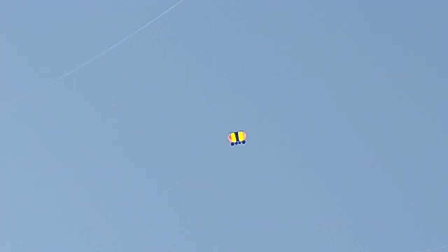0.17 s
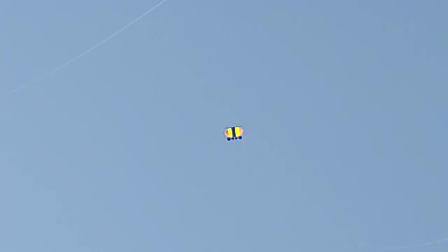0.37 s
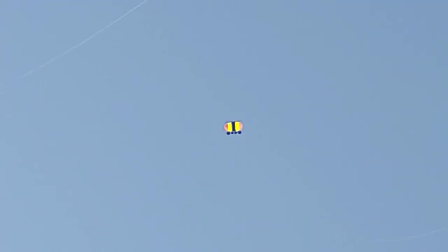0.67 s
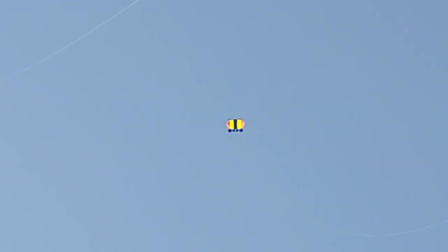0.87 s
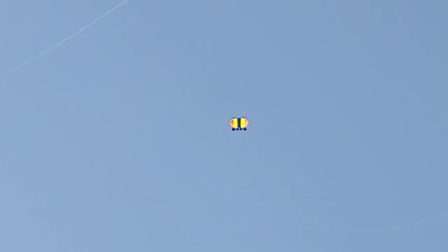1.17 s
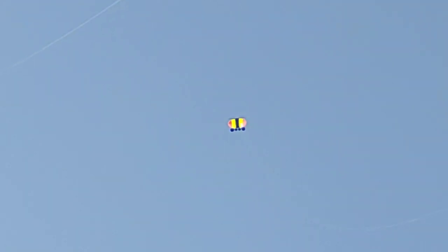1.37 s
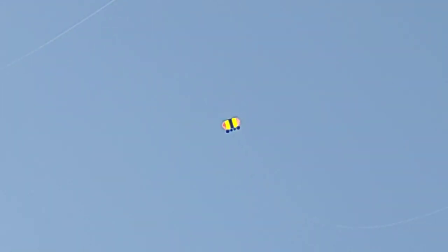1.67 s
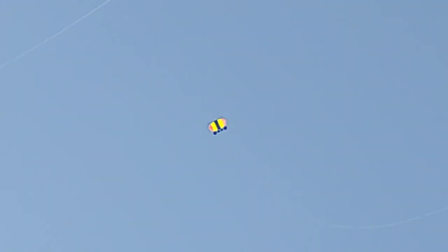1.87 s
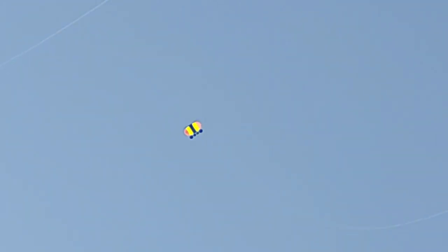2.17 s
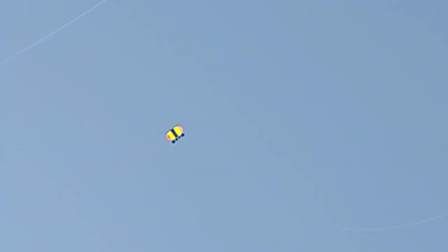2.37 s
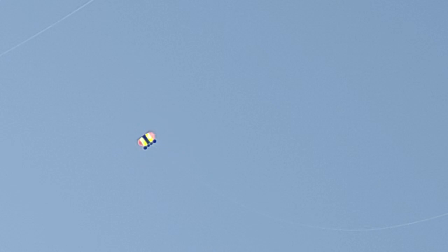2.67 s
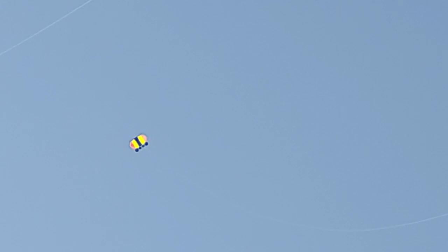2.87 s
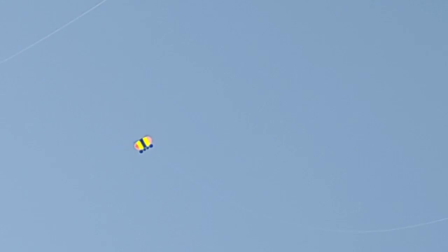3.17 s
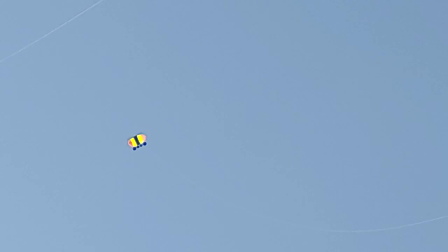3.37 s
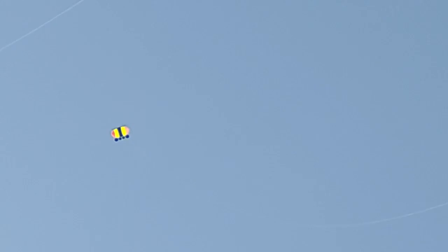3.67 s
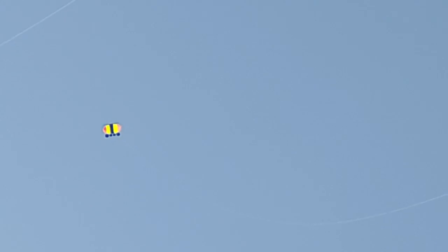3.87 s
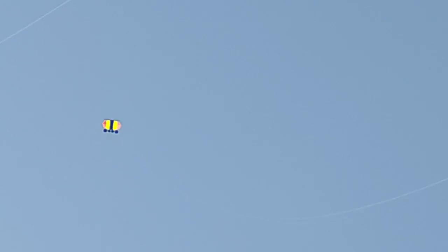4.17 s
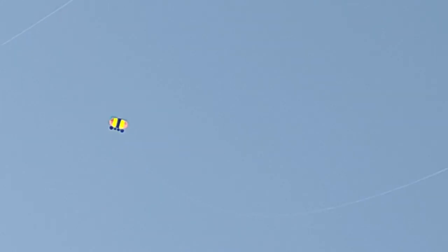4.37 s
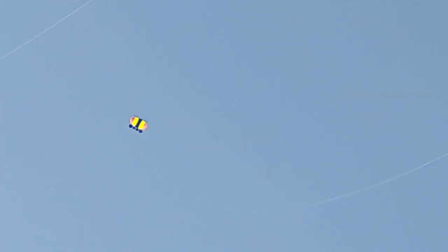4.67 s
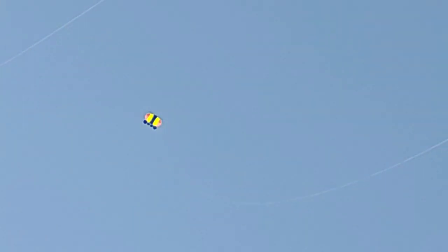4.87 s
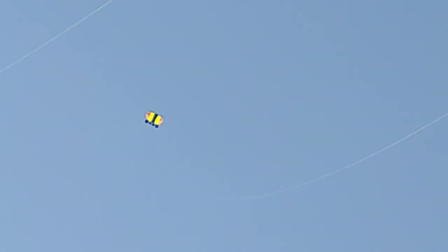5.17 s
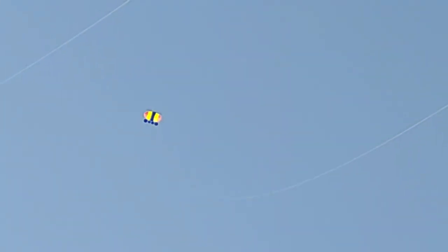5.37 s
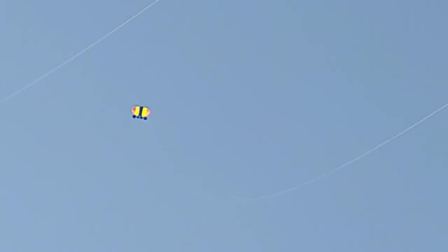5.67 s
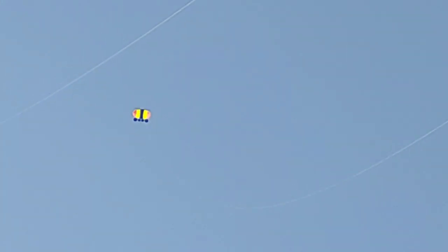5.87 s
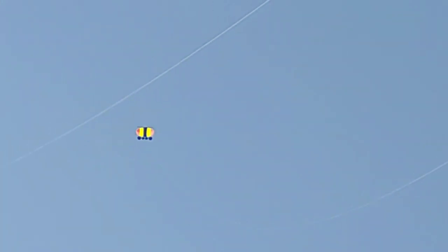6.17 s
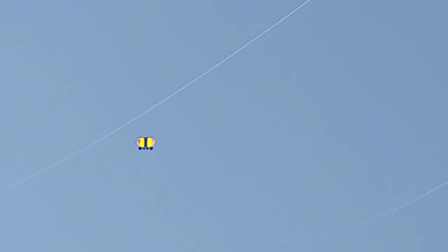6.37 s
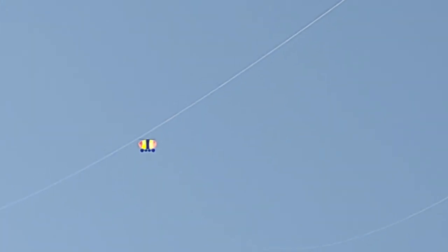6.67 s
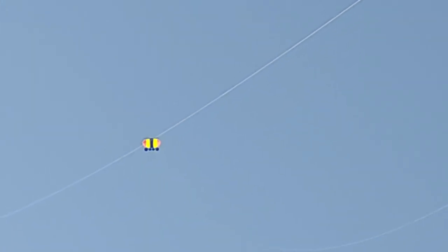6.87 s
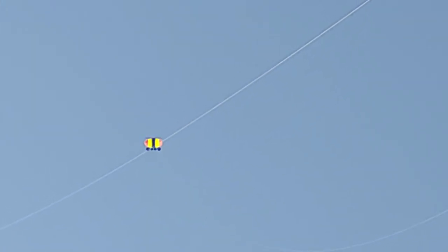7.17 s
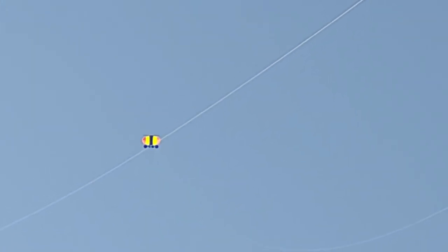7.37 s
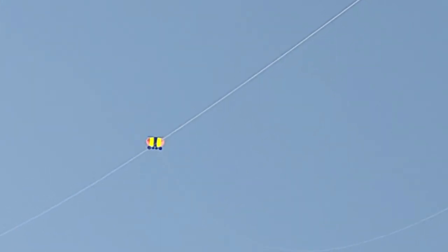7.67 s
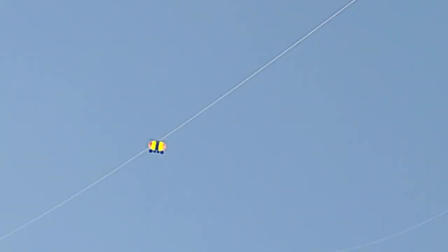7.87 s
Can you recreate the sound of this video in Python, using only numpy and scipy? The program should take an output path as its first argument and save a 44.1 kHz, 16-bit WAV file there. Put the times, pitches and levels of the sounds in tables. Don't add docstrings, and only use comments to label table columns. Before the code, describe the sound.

A wavering, reedy low drone from wind-driven kite ribbons outdoors, swelling and fading over faint wind wash, with lumpy gusts thumping the left side.

```python
import sys
import numpy as np
from scipy import signal
from scipy.io import wavfile

SR = 44100
rng = np.random.default_rng(int(sys.argv[2]) if len(sys.argv) > 2 else 0)


def file_out(sig):
    cols = np.atleast_2d(sig).T
    lim = np.clip(cols, -1, 1)
    pcm = np.round(lim * 32767).astype(np.int16)
    wavfile.write(sys.argv[1], SR, pcm)


def gain_from_db(level_db):
    decades = np.asarray(level_db, float) / 20
    return 10 ** decades


N = 353020
CONTROL = 40

# [t/s, big f/Hz, shrill f/Hz, thin f/Hz, mellow f/Hz]
NEAR_PITCH = [(0.0, 64.07, 84.49, 89.88, 73.0), (0.5, 64.1, 84.46, 89.7, 72.62),
              (1.0, 64.23, 84.7, 89.7, 72.77), (1.5, 64.05, 84.76, 89.77, 73.23),
              (2.0, 63.89, 84.8, 89.63, 73.76), (2.5, 63.89, 85.0, 89.41, 74.11),
              (3.0, 64.05, 85.1, 89.34, 74.11), (3.5, 64.07, 85.1, 89.92, 73.06),
              (4.0, 64.12, 84.97, 90.35, 73.23), (4.5, 64.1, 84.9, 90.09, 73.23),
              (5.0, 64.1, 85.07, 89.7, 73.23), (5.5, 64.15, 84.93, 89.23, 73.09),
              (6.0, 64.25, 84.87, 89.34, 72.91), (6.5, 64.41, 84.83, 89.95, 72.85),
              (7.0, 64.38, 85.04, 90.49, 72.82), (7.5, 64.46, 85.04, 90.74, 72.82),
              (8.0, 64.46, 85.1, 90.13, 72.82)]
FAR_PITCH_HZ = [45.92, 68.25]
# [left level/dB, right level/dB]
BIG = [(-63.0, -64.0), (-64.0, -61.0), (-52.0, -54.0), (-80.0, -74.0), (-59.0, -67.0), (-62.0, -65.0),
       (-60.0, -58.0), (-70.0, -72.0), (-55.0, -57.0), (-65.0, -55.0), (-47.0, -50.0), (-46.0, -49.0),
       (-46.0, -48.0), (-56.0, -52.0), (-60.0, -63.0), (-61.0, -61.0), (-72.0, -65.0), (-65.0, -63.0),
       (-67.0, -63.0), (-69.0, -64.0), (-73.0, -68.0), (-68.0, -78.0), (-68.0, -71.0), (-64.0, -60.0),
       (-70.0, -63.0), (-67.0, -63.0), (-78.0, -70.0)]
SHRILL = [(-69.0, -67.0), (-63.0, -63.0), (-80.0, -81.0), (-73.0, -71.0), (-65.0, -64.0), (-80.0, -80.0),
          (-71.0, -71.0), (-71.0, -63.0), (-62.0, -68.0), (-57.0, -58.0), (-60.0, -55.0), (-66.0, -66.0),
          (-70.0, -71.0), (-72.0, -66.0), (-68.0, -65.0), (-77.0, -79.0)]
THIN = [(-70.0, -64.0), (-66.0, -76.0), (-63.0, -63.0), (-67.0, -65.0), (-66.0, -65.0), (-74.0, -70.0),
        (-66.0, -62.0), (-70.0, -69.0), (-74.0, -66.0), (-71.0, -73.0), (-76.0, -75.0), (-75.0, -73.0),
        (-73.0, -73.0), (-75.0, -77.0), (-78.0, -81.0), (-77.0, -86.0)]
MELLOW = [(-51.0, -54.0), (-57.0, -56.0), (-71.0, -63.0), (-58.0, -60.0), (-61.0, -64.0), (-62.0, -63.0),
          (-70.0, -65.0), (-64.0, -64.0), (-68.0, -73.0), (-61.0, -63.0), (-65.0, -65.0), (-60.0, -63.0),
          (-72.0, -70.0)]
DEEP = [(-62.0, -62.0), (-60.0, -65.0), (-53.0, -57.0), (-77.0, -63.0), (-67.0, -67.0), (-73.0, -69.0),
        (-61.0, -62.0), (-63.0, -68.0), (-64.0, -63.0), (-66.0, -66.0), (-65.0, -64.0), (-71.0, -63.0)]
SOFT = [(-70.0, -62.0), (-69.0, -69.0), (-79.0, -68.0), (-58.0, -60.0), (-55.0, -57.0), (-60.0, -60.0),
        (-62.0, -73.0)]
# [left level/dB, right level/dB]
THIN_LOW = [(-60.0, -62.0)]
FIRST_OVERTONE = [2, 5, 12, 2, 17, 3, 6]
# [level/dB, left lag/ms, tilt above 1.2 kHz/dB per octave]
PLACE = [
    (3, -0.068, -5.5),
    (8, 0.13, 5.5),
    (-8, 0.063, 12),
    (4.5, -0.068, 0),
    (1, -0.11, -9),
    (3, 0.09, 0),
    (-6, 0.03, 0),
]
# [t/s, level/dB over usual]
BIG_SWINGS = [(.01, 1), (.28, -4.5), (.75, 3.5), (1.2, 7), (1.6, -3.5), (1.85, -5.5), (2.5, 2), (3.0, 3.5),
              (3.38, -2), (3.75, 1), (4.25, 3), (5.0, -0.1), (5.45, -3.5), (5.65, -4), (6.2, 3.5),
              (6.52, 9), (6.85, 3.5), (7.3, 0.5), (7.9, 3.5)]
SHRILL_SWINGS = [(.01, 5.5), (.27, -8.5), (.66, 4.5), (1.15, 0.5), (1.5, -8.5), (1.85, 2.5), (2.2, 1.5),
                 (2.5, 3.5), (2.75, -1), (2.95, 1), (3.22, -7.5), (3.58, 7), (4.1, -4), (4.55, -5.5),
                 (4.8, -3), (5.15, 2.5), (5.45, -5.5), (5.68, 4), (5.95, 5.5), (6.28, -2.5), (6.52, 4.5),
                 (7.0, 3.5), (7.25, -7.5), (7.5, 4), (7.75, -3)]
THIN_SWINGS = [(.3, 2.5), (.75, -4), (1.05, 8), (1.3, 9), (1.6, 7.5), (1.9, 6.5), (2.2, 0), (2.5, 8.5),
               (2.8, 8.5), (3.1, 8), (3.5, 6), (4.0, 2), (4.3, 7), (4.55, 2.5), (4.9, 3), (5.2, -13),
               (5.6, 4), (5.95, 2), (6.3, 1.5), (6.6, 1), (7.0, 1), (7.3, 4.5), (7.6, -5), (7.9, 1)]
MELLOW_SWINGS = [(.01, 0), (.5, -13), (1.25, -4), (1.55, 1.5), (2.55, -6), (2.95, 3), (3.25, 7.5),
                 (3.65, -12), (4.4, -5), (5.0, 0), (6.0, -8), (6.75, -5), (7.1, 6)]
DEEP_SWINGS = [
    (.12, -35),
    (1.12, -19),
    (3.1, 11),
    (3.75, -4),
    (4.0, 6),
    (4.75, -5),
    (5.25, 9),
    (5.75, -37),
    (6.75, -14),
    (7.25, -1),
]
USUAL_DB = [0.073, .1, 1.24, 0.24, .1]
SWING_S = [0.17, 0.14, 0.16, 0.17, 0.22]
# [t/s, level/dB]
THIN_LOW_SWINGS = [
    (.1, 19),
    (.5, 14),
    (.85, 1),
    (1.6, 4),
    (3.4, 14),
    (3.8, 18.5),
    (4.1, 11),
    (5.6, 4),
    (7.0, 10),
]
# [t/s, level/dB]
BIG_UNDER = [
    (.8, 7),
    (1.5, 0),
    (2.1, -5),
    (2.6, -2),
    (3.1, -3),
    (3.9, -0.5),
    (4.9, -6),
    (5.75, 2),
    (6.6, -1),
    (7.4, -7),
]
BIG_OVER = [
    (.4, -3),
    (1.05, -8),
    (1.55, 9.5),
    (2.2, 2),
    (2.95, 2),
    (3.8, 0),
    (4.9, 1),
    (5.6, -6),
    (6.4, -8),
    (7.4, -4),
]
BIG_SIDE = [(.3, 3), (1.0, 0.5), (1.7, 1), (2.5, 3.5), (3.4, -9), (4.0, -11), (4.6, -10), (5.2, 2),
            (6.1, 0), (6.8, 3.5), (7.5, 0)]
TWIST_S = 0.34
UNDER_HZ, OVER_HZ, TWIST_WIDTH_HZ = 257, 980, 64
SIDE_HZ, SIDE_WIDTH_HZ = 680, 52
# [t/s, level/dB]
GLINTS = [(.05, -4), (.3, 2.5), (.65, 2.5), (1.0, -3), (2.1, 1.5), (2.4, -1), (3.25, -5), (4.25, 2),
          (5.45, 2), (6.25, 4), (6.45, -4), (6.62, 6.5), (6.95, -3), (7.15, 6), (7.9, 0)]
GLINT_S, GLINT_HZ, GLINT_WIDTH_HZ = 0.096, 1610, 85
SHIMMER, FLUTTER, BLUR = .2, .16, .13
SHRILL_BLUR = 1.7
# [left level/dB, right level/dB]
SHRILL_BUZZ = [(-85, -85), (-79.5, -83), (-77, -81), (-82, -77), (-85, -92), (-87, -98), (-92, -97),
               (-85, -80.5), (-80.5, -85), (-101, -94), (-89, -92), (-98, -97), (-82.5, -89.5),
               (-96, -94.5), (-83.5, -99)]
THIN_BUZZ = [(-85, -93), (-89, -86), (-97, -91), (-86, -93), (-86.5, -92), (-80, -90), (-86, -93),
             (-84, -96), (-79, -94), (-87.5, -99), (-91, -100), (-87, -97), (-97, -102), (-90, -94),
             (-94, -101), (-88, -102)]
BUZZ_FOLLOWS, THIN_BUZZ_FOLLOWS = 0.51, .25
# [t/s, level/dB]
THIN_BUZZ_SWINGS = [(.4, -6), (.7, 2.5), (1.08, 3), (1.3, 3), (1.55, -9), (1.9, -11), (2.2, -7), (2.5, -1),
                    (2.9, -2), (3.6, 5), (4.4, 3), (5.5, 5), (5.95, 11), (6.5, 9.5), (6.95, 10), (7.5, 1.5)]

# [t/s, peak level/dB, f/Hz]
STRONG_EDDIES = [(0.287, -12, 114), (0.481, -15.5, 136), (0.506, -14, 94), (0.698, -17, 141),
                 (1.555, -16.5, 108), (1.643, -16, 113), (2.108, -20.5, 112), (3.632, -16.5, 82),
                 (3.693, -17, 134), (3.737, -12.5, 119), (3.79, -14, 154), (3.936, -12.5, 92),
                 (4.055, -5, 183), (4.068, -8, 115), (4.08, -15, 170), (4.089, -15, 123), (4.128, -10, 92),
                 (4.159, -14.5, 116), (4.174, -16, 149), (4.194, -13.5, 130), (4.241, -14, 80),
                 (4.45, -12, 108), (5.057, -13.5, 151), (5.083, -15, 90), (5.095, -6, 200),
                 (5.103, -6.5, 144), (5.112, -13, 130), (5.127, -8.5, 110), (5.139, -15.5, 230),
                 (5.15, -14, 99), (5.177, -12, 105), (5.221, -8.5, 105), (5.236, -12, 94),
                 (5.499, -16.5, 105), (5.788, -18, 98), (5.869, -17, 127), (6.268, -17, 105),
                 (7.173, -14.5, 114)]
# [t/s, peak level/dB, f/Hz]
WEAK_EDDIES = [(0.37, -20, 94), (0.614, -17.5, 91), (0.751, -31, 101), (0.808, -25, 98), (0.832, -24, 100),
               (0.901, -21, 101), (0.944, -25.5, 100), (0.987, -18.5, 93), (1.117, -18.5, 134),
               (1.173, -16.5, 100), (1.212, -21.5, 83), (1.258, -21, 92), (1.676, -26, 84),
               (1.856, -22.5, 98), (2.09, -15, 88.4), (3.314, -27, 142), (3.484, -25, 97),
               (3.543, -23, 121), (3.587, -22, 126), (3.765, -17, 99), (3.827, -16, 119), (3.851, -26, 87),
               (3.879, -28, 100), (3.975, -28, 95), (4.285, -17.5, 80), (4.392, -22, 114), (4.505, -24, 92),
               (4.531, -21.5, 118), (4.559, -24, 92), (4.64, -20, 106), (4.818, -20.5, 83),
               (4.843, -18, 92.5), (4.945, -19.0, 124), (5.003, -26, 104), (5.035, -18, 102),
               (5.251, -16, 91), (5.28, -15.5, 109), (5.352, -25, 114), (5.402, -16, 107),
               (5.443, -16.5, 130), (5.538, -18, 113), (5.639, -24, 105), (5.717, -29, 119),
               (5.817, -21.5, 147), (5.891, -17.5, 82.5), (6.18, -25, 81.5), (6.238, -18.5, 103),
               (6.354, -19.5, 91), (6.377, -26, 92), (6.417, -17.5, 111), (6.802, -17.5, 145),
               (6.849, -21, 119), (6.9, -21, 95), (7.021, -24.5, 97), (7.063, -21, 105), (7.087, -24, 113),
               (7.122, -27, 94), (7.213, -19, 119)]
EDDY_RISE, EDDY_FALL = 0.72, 0.67
# [t/s, level at the left port/dB]
GUST = [(0, -44), (.35, -40), (.75, -36.5), (1.1, -41), (2.0, -41), (2.5, -46), (2.8, -44), (3.3, -45),
        (3.75, -38), (4.15, -45.5), (4.85, -39), (5.25, -32.5), (5.5, -39.5), (6.25, -41.5), (6.55, -43),
        (7.05, -35.5), (7.5, -48.5), (8, -41.5)]
LEE_DB, LEE_FOLLOWS = -48.5, 0.48

# [t/s, level/dB, share in the top colour/0-1]
FLARES = [(.01, 7, 0.34), (.68, 13, 0.34), (1.1, 2, 0.86), (1.3, 3.5, 1), (1.9, 14, 0.1), (2.2, -1, .1),
          (2.55, 9, 0.24), (3.0, 5.5, 0.56), (3.48, 10, 0.25), (3.65, 21, 0.46), (4.15, 5, 0.26),
          (5.17, 14, 0.14), (5.72, 12.5, 0.14), (6.02, 14, 0.32), (6.6, 4, 0.44), (6.98, 10.5, 0.41),
          (7.55, 15, 0.11)]
# [t/s, level/dB]
LULLS = [(.3, -1.5), (.85, -2), (1.45, -2), (1.6, -0.5), (2.25, -4.5), (3.75, 0.5), (4.7, -5), (5.45, -1),
         (6.3, -1), (6.8, 2), (7.2, 1), (7.85, -3)]
FLARE_S, BRIGHT_S = .12, 0.089
# [f/Hz, density/dB per Hz]
WASH_LOW = [(150, 4.5), (250, 3), (320, -9.5), (500, 0), (650, -4.5), (850, 5), (1050, -8), (1300, -1)]
WASH_MID = [(900, -18), (1130, 2), (1270, 11), (1400, -25), (1600, -8), (1780, -24), (2200, -28)]
WASH_HIGH = [(1500, -6.5), (1800, 12.5), (2000, -1.5), (2250, -1), (2450, -3.5), (2900, -32), (3600, -23.5),
             (5000, -31)]
WASH_LOW_DB, WASH_MID_DB, WASH_HIGH_DB = -45.5, -62.5, -58.5
# [t/s, level/dB]
AIR = [
    (0, 2.5),
    (1.4, 1.5),
    (2.0, -0.5),
    (3.0, 0),
    (4.1, 3),
    (5.0, -3),
    (5.8, -1),
    (6.8, 0),
    (8, -3.5),
]
# [f/Hz, density/dB per Hz]
HISS = [(1650, -33), (2800, -14), (3570, -11), (6570, -15), (10400, -24), (12200, -22.5), (15600, -24)]
HISS_START_DB, HISS_FADE_DB_PER_S, HISS_FOLLOWS_FLARE = -68, 0.13, .08
# [t/s, level/dB]
PUFFS = [
    (.35, 0),
    (1.15, 1),
    (2.05, 0.5),
    (4.45, 0.5),
    (4.9, 2),
    (6.4, -1.5),
]
PUFF_S = 0.26
# [f/Hz, likeness/-1 to 1]
LIKENESS = [(60, 0.2), (130, 1), (290, 1), (640, -0.0093), (1410, -0.27), (2300, 0.18), (3800, -0.042),
            (15000, -0.0039)]
# [f/Hz, left minus right/dB]
LEANING = [(60, 6.5), (92, 11), (140, -2), (210, 0), (330, 3.5), (500, 3), (770, 2.5), (1170, -1),
           (1790, -3), (2740, 8.5), (4190, 6), (6410, 5.5), (9810, -2.5), (15000, 8)]


def hummers(bright_db):
    still = np.ones(N // CONTROL + 1)
    ribbons = [BIG, SHRILL, THIN, MELLOW, DEEP, SOFT, THIN_LOW]
    pitches = in_time(NEAR_PITCH, step=CONTROL) + [hz * still for hz in FAR_PITCH_HZ]
    pitches.append(pitches[2])
    turns = [BIG_SWINGS, SHRILL_SWINGS, THIN_SWINGS, MELLOW_SWINGS, DEEP_SWINGS]
    swells = [db + swings(rows, s) for rows, db, s in zip(turns, USUAL_DB, SWING_S)]
    swells += [0 * still, swings(THIN_LOW_SWINGS, 0.29)]
    out = 0
    for ribbon, hz, swell_db, first, place in zip(ribbons, pitches, swells, FIRST_OVERTONE, PLACE):
        out = out + hummer(ribbon, hz, swell_db, first, place, bright_db)
    return signal.resample_poly(out, 4, 1, axis=1, padtype="reflect")[:, :N]


def hummer(ribbon, hz, swell_db, first, place, bright_db):
    level_db, lag_ms, tilt_db = place
    wavering_hz = filled(hz * (1 + .001 * drift(3).real), step=4)
    turn = 2 * np.pi * np.cumsum(wavering_hz) / (SR / 4) + rng.uniform(1, 5)
    spin = np.exp(1j * turn)
    tone = spin ** (first - 1)
    loose = SHRILL_BLUR if ribbon is SHRILL else 1
    colour = ribbon_colour(ribbon)
    out = 0
    for k, ears_db in enumerate(ribbon, first):
        overtone_hz = k * hz.mean()
        beam = min(overtone_hz / 700, 1)
        scatter = 1 + SHIMMER * drift(1.2) + beam * loose * (FLUTTER * drift(5) + BLUR * drift(25))
        top_db = tilt_db * max(np.log2(overtone_hz / 1200), 0)
        for swell, centre_hz, width_hz in colour:
            top_db = top_db + swell * np.exp(-((overtone_hz - centre_hz) / width_hz) ** 2)
        tone = tone * spin
        snap = rng.normal(0, 1.17)
        size = filled(scatter * gain_from_db(beam * swell_db + level_db + top_db), step=4)
        wave = size * tone * np.exp(1j * snap)
        late = np.exp(-2j * np.pi * overtone_hz * lag_ms / 1000)
        out = out + gain_from_db(np.array(ears_db))[:, None] * np.array([(wave * late).real, wave.real])
    if ribbon is SHRILL:
        wave = wave * filled(gain_from_db(BUZZ_FOLLOWS * bright_db - top_db), step=4)
        out = out + buzz(wave, spin, SHRILL_BUZZ, 0.1)
    if ribbon is THIN:
        wave = wave * filled(gain_from_db(THIN_BUZZ_FOLLOWS * bright_db - top_db), step=4)
        wave = wave * filled(gain_from_db(swings(THIN_BUZZ_SWINGS, .13)), step=4)
        out = out + buzz(wave, spin, THIN_BUZZ, 4.5)
    return out


def ribbon_colour(ribbon):
    colour = []
    if ribbon is BIG:
        colour += [(swings(BIG_UNDER, TWIST_S), UNDER_HZ, TWIST_WIDTH_HZ),
                   (swings(BIG_OVER, TWIST_S), OVER_HZ, TWIST_WIDTH_HZ),
                   (swings(BIG_SIDE, TWIST_S), SIDE_HZ, SIDE_WIDTH_HZ)]
    if ribbon is BIG or ribbon is SHRILL:
        colour.append((swings(GLINTS, GLINT_S), GLINT_HZ, GLINT_WIDTH_HZ))
    return colour


def buzz(wave, spin, table, level_db):
    out = 0
    for ears_db in table:
        wave = wave * spin
        out = out + gain_from_db(np.array(ears_db) + level_db)[:, None] * wave.real
    return out


def buffeting():
    slope = signal.butter(2, 85, fs=SR, output="sos")
    bass_cut = signal.butter(5, 47.0, "high", fs=SR, output="sos")
    lumps = gain_from_db(3 * np.array([filled(drift(14).real), filled(drift(14).real)]))
    noise = signal.sosfilt(np.vstack([slope, bass_cut]), lumps * rng.standard_normal((2, N)))
    gust_db, = in_time(GUST)
    lee_db = LEE_DB + LEE_FOLLOWS * (gust_db - gust_db.mean())
    rumble = rms_one(noise) * gain_from_db(np.array([gust_db, lee_db]) + np.array([[3.0], [5.5]]))
    return rumble + signal.sosfilt(bass_cut, thumps()) * gain_from_db(np.array([[0], [-30.0]]))


def thumps():
    eddies = list(STRONG_EDDIES) + list(WEAK_EDDIES)
    out = np.zeros(N + SR)
    phases = np.pi / 2 + rng.normal(0, .7, len(eddies))
    for (s, db, hz), phase in zip(eddies, phases):
        cycles = np.arange(-SR // 20, SR // 8) * hz / SR
        shape = np.exp(-(cycles / np.where(cycles < 0, EDDY_RISE, EDDY_FALL)) ** 2)
        turn = 2 * np.pi * (cycles - .035 * cycles * np.abs(cycles)) + phase
        steepness = np.clip((db + 34.0) / 67.0, 0, 1)
        front = steepness * np.exp(-(cycles / .5) ** 2)
        start = max(round(s * SR) - SR // 20, 0)
        wave = shape * np.cos(turn) + front * np.cos(1.84 * turn)
        out[start:start + len(cycles)] += gain_from_db(db - 4.0) * wave
    return out[:N]


def far_wash(bright_db):
    air_db, = in_time(AIR)
    flare_db = filled(swings([(s, db) for s, db, _ in FLARES], FLARE_S))
    wash = gain_from_db(WASH_LOW_DB + air_db) * wind_noise(WASH_LOW, patchy_db=2.5)
    wash += gain_from_db(WASH_MID_DB + flare_db) * wind_noise(WASH_MID, patchy_db=5.5)
    wash += gain_from_db(WASH_HIGH_DB + bright_db) * wind_noise(WASH_HIGH, patchy_db=3.0)
    return wash


def air_hiss(bright_db):
    fading_db = HISS_START_DB - HISS_FADE_DB_PER_S * np.arange(N) / SR
    hiss_db = fading_db + HISS_FOLLOWS_FLARE * bright_db + filled(swings(PUFFS, PUFF_S))
    return gain_from_db(hiss_db) * wind_noise(HISS, patchy_db=1.5)


def wind_noise(spectrum, patchy_db):
    low_hz, top_hz = spectrum[0][0], min(spectrum[-1][0], SR * .45)
    edges = np.geomspace(low_hz, top_hz, round(4 * np.log2(top_hz / low_hz)))
    out, together, white = 0, drift(2.1).real, rng.standard_normal((2, 2, N))
    for k, (low, high) in enumerate(zip(edges, edges[1:])):
        band = signal.butter(2, [low, high], "band", fs=SR, output="sos")
        mid, side = signal.sosfilt(band, white[k % 2])
        hz = np.sqrt(low * high)
        alike = np.clip(at_hz(LIKENESS, hz), -1, 1)
        flicker_db = patchy_db * (.5 * together + drift(6.6).real)
        gain = filled(gain_from_db(at_hz(spectrum, hz) + flicker_db))
        ears = gain_from_db(at_hz(LEANING, hz) * np.array([[.5], [-.5]]))
        out = out + gain * ears * (np.sqrt(1 + alike) * mid + np.sqrt(1 - alike) * side * [[1], [-1]])
    return out / np.sqrt(np.mean(out.mean(axis=0) ** 2))


def drift(rate_hz):
    r = np.exp(-2 * np.pi * rate_hz * CONTROL / SR)
    white = rng.standard_normal((2, N // CONTROL + 1001))
    settled = signal.lfilter([1], [1, -2 * r, r * r], white[0] + 1j * white[1])[1000:]
    return rms_one(settled)


def swings(rows, length_s):
    s, db = np.transpose(rows)
    return db @ np.exp(-((np.arange(0, N, CONTROL) / SR - s[:, None]) / length_s) ** 2)


def filled(slow, step=1):
    return np.interp(np.arange(0, N, step) / CONTROL, np.arange(len(slow)), slow)


def in_time(rows, step=1):
    s, *columns = np.transpose(rows)
    return [np.interp(np.arange(0, N, step) / SR, s, c) for c in columns]


def at_hz(points, hz):
    points_hz, values = np.transpose(points)
    return np.interp(np.log(hz), np.log(points_hz), values)


def rms_one(x):
    return x / np.sqrt(np.mean(np.abs(x) ** 2) + 1e-20)


def scene():
    gusts_aloft = [(s, db * share) for s, db, share in FLARES]
    bright_db = filled(swings(gusts_aloft + LULLS, BRIGHT_S))
    kites = hummers(bright_db[::CONTROL])
    return kites + buffeting() + far_wash(bright_db) + air_hiss(bright_db)


def roll_off(x):
    return signal.sosfilt(signal.butter(12, 15700, fs=SR, output="sos"), x)


def record(dry):
    mix = 0.45 * np.tanh(dry / 0.43)
    return roll_off(mix)


dry = scene()
out = record(dry)
file_out(out)
```